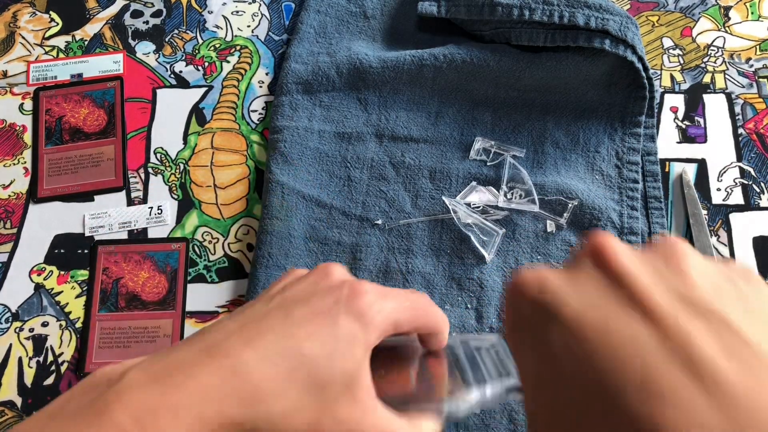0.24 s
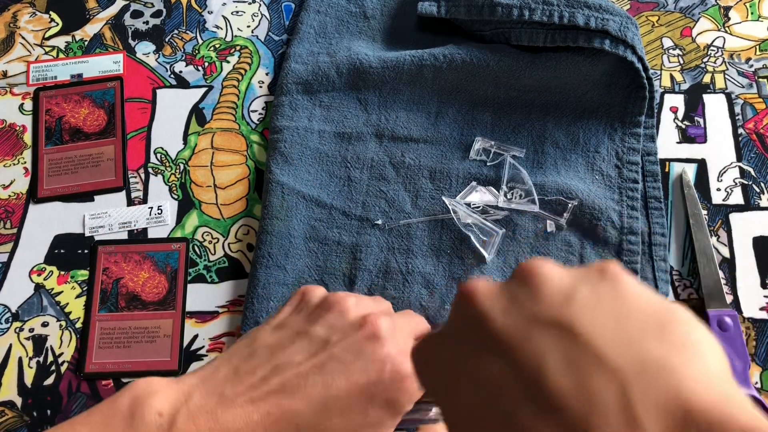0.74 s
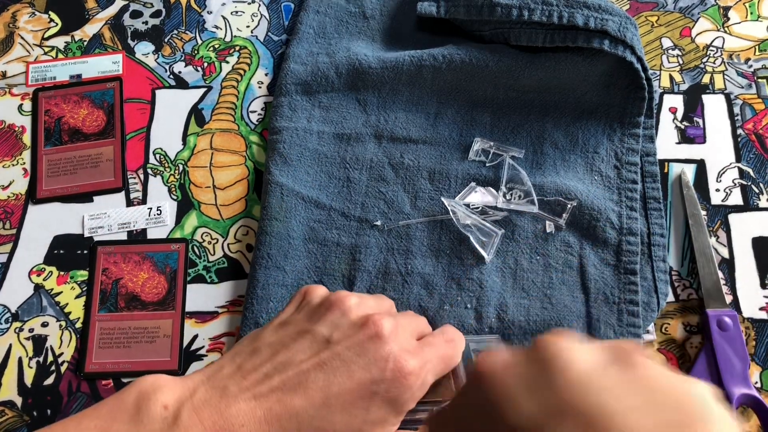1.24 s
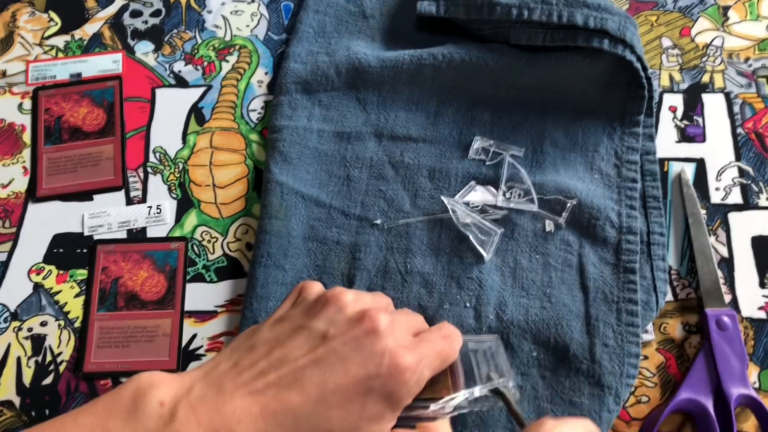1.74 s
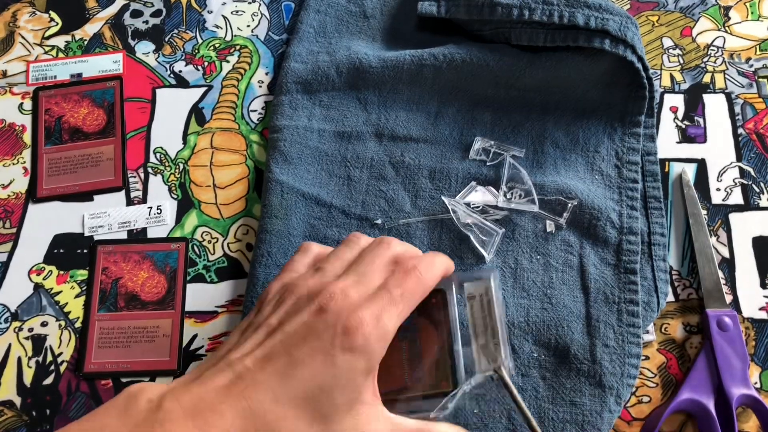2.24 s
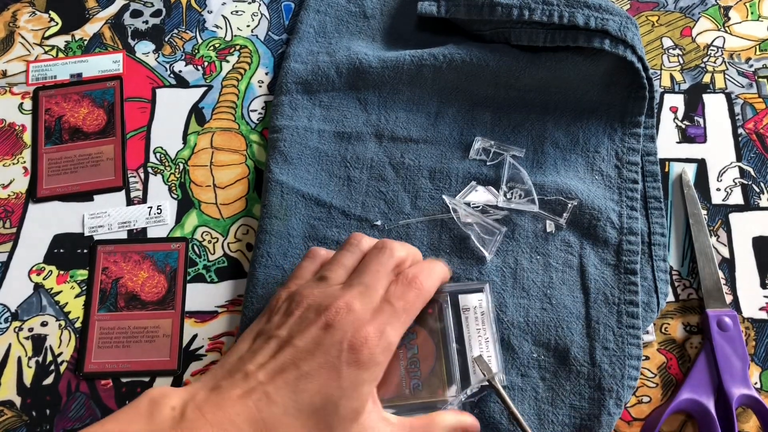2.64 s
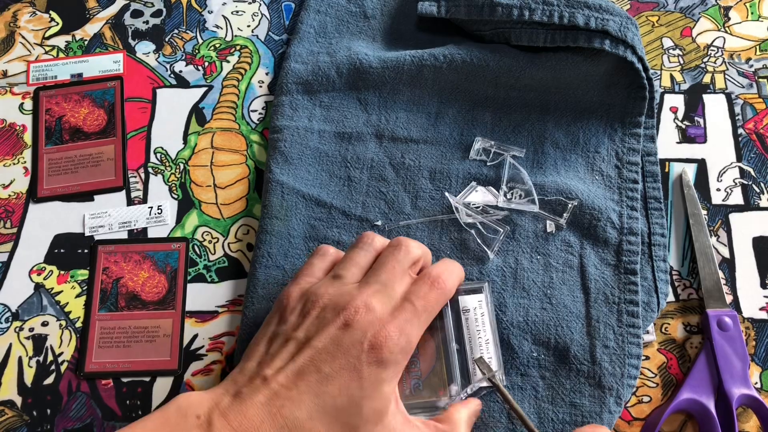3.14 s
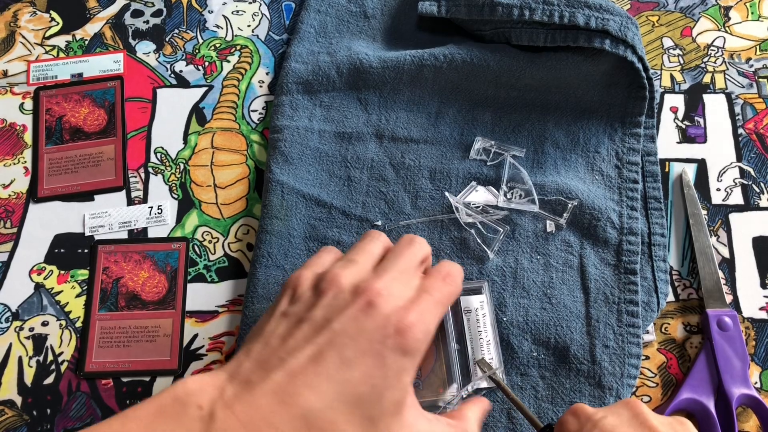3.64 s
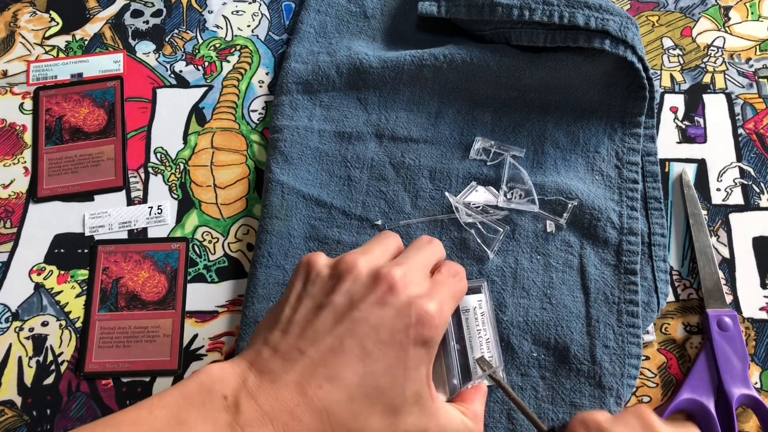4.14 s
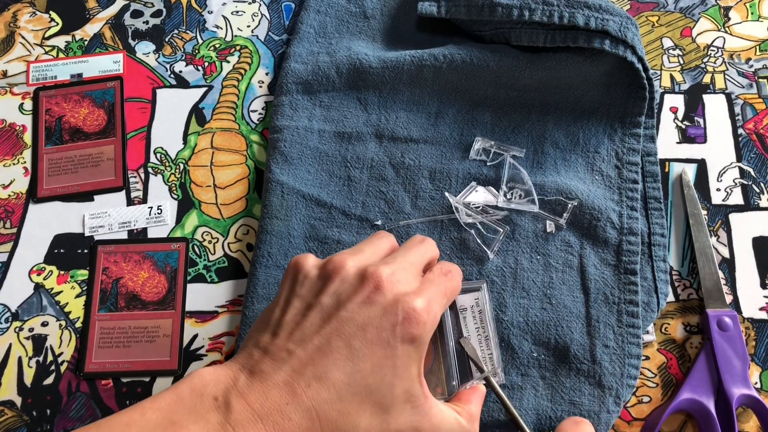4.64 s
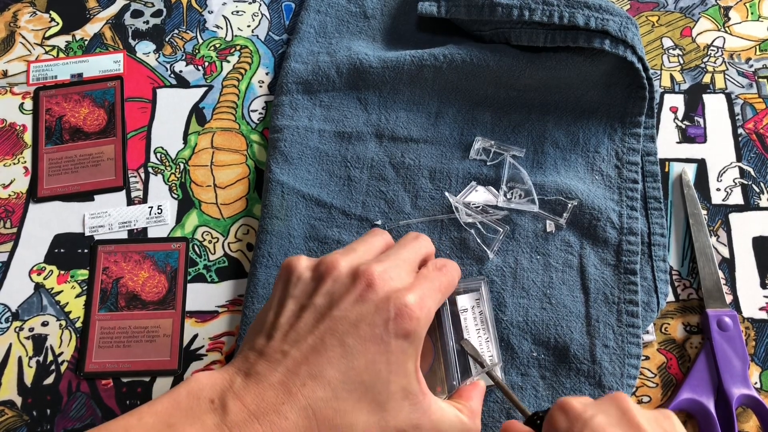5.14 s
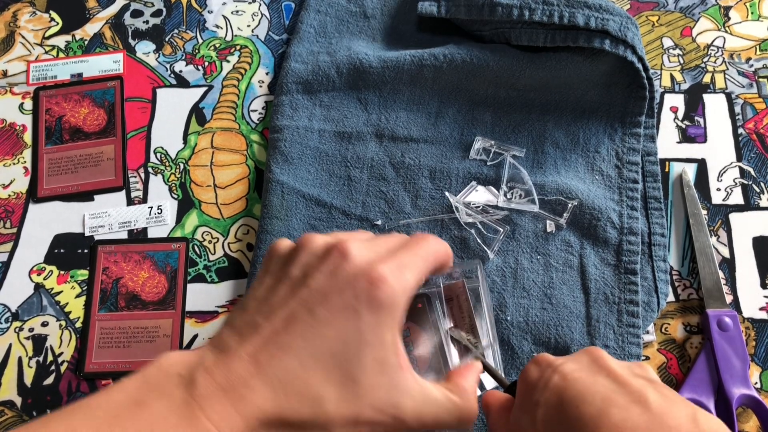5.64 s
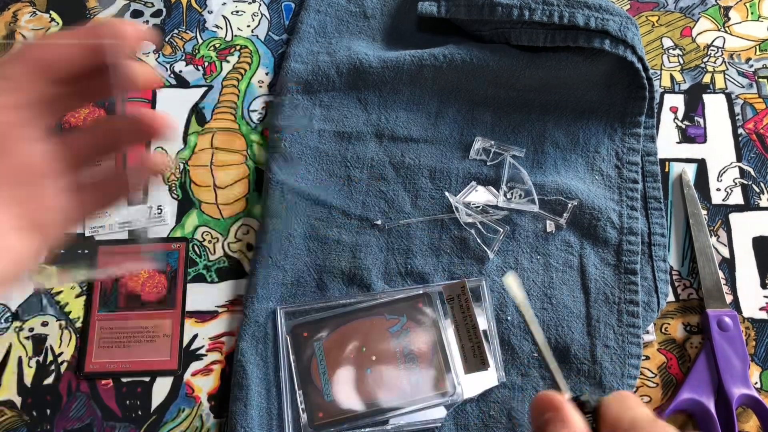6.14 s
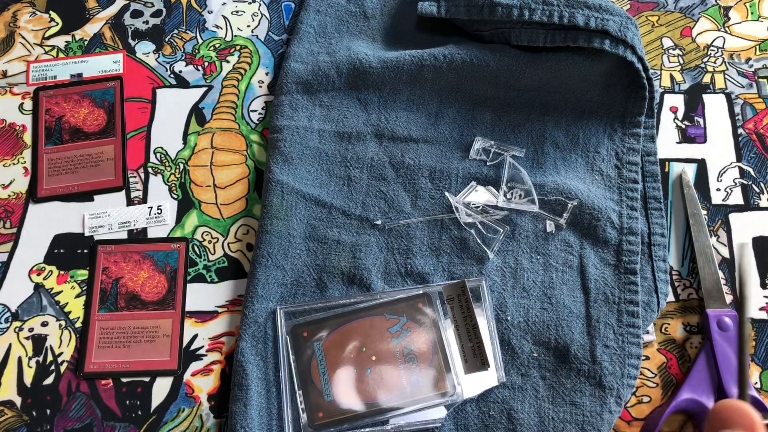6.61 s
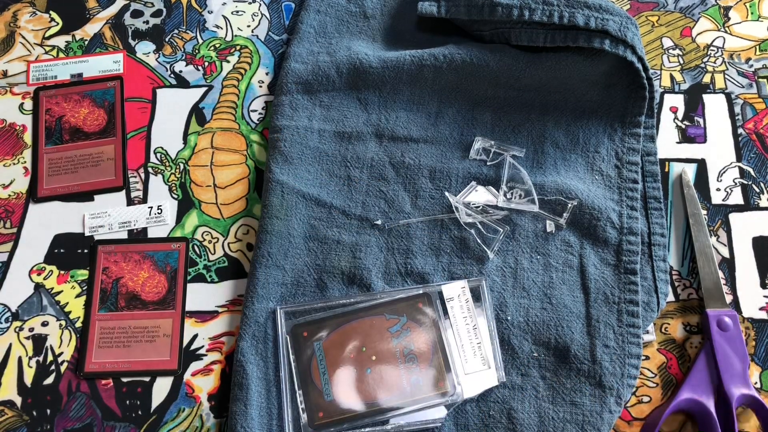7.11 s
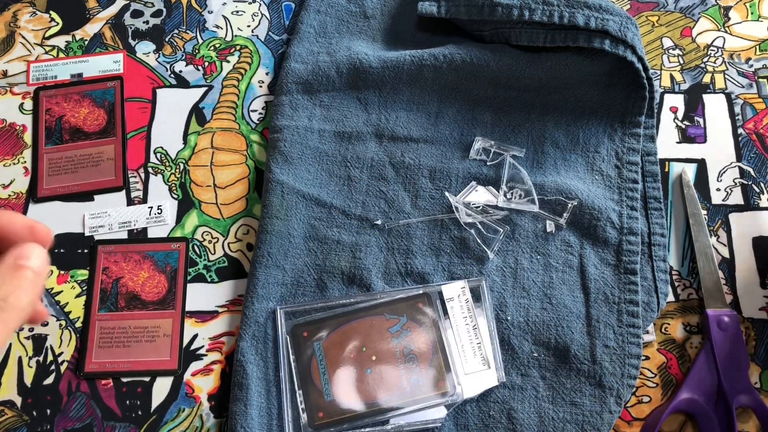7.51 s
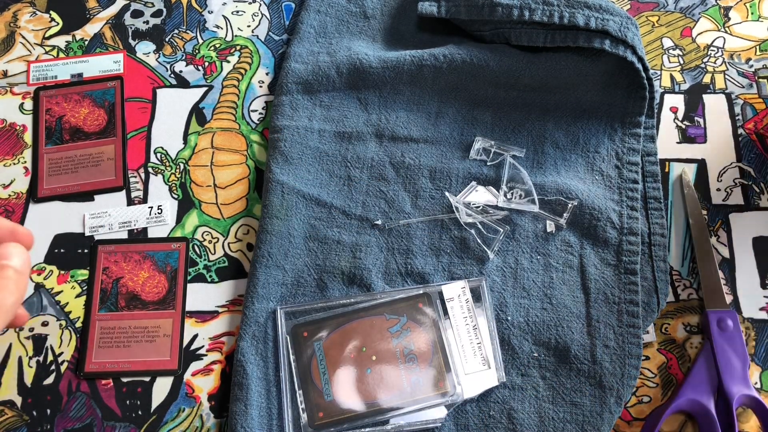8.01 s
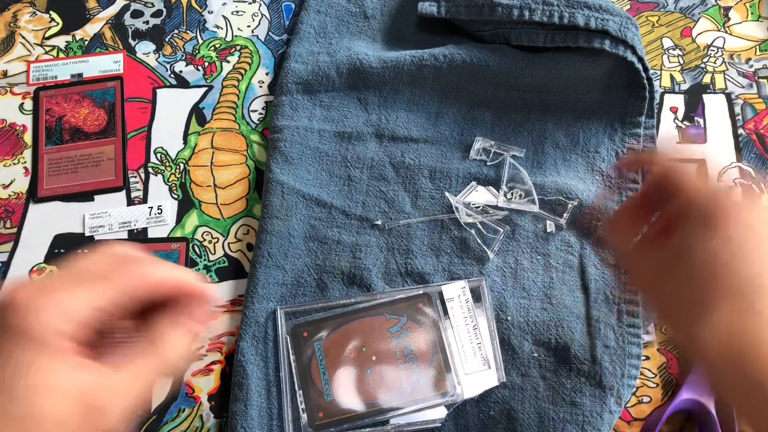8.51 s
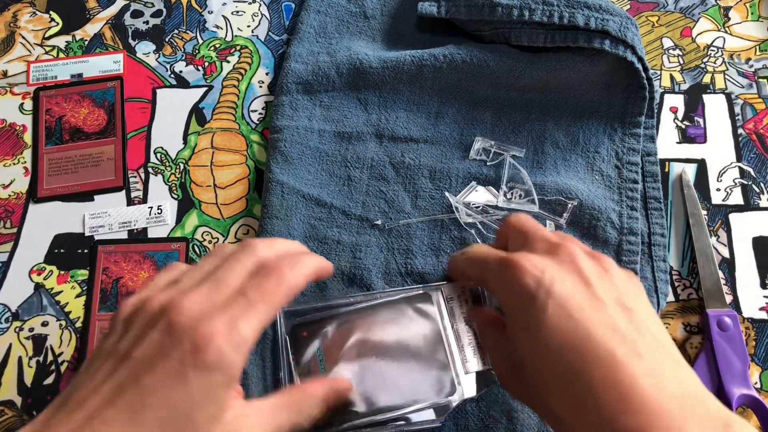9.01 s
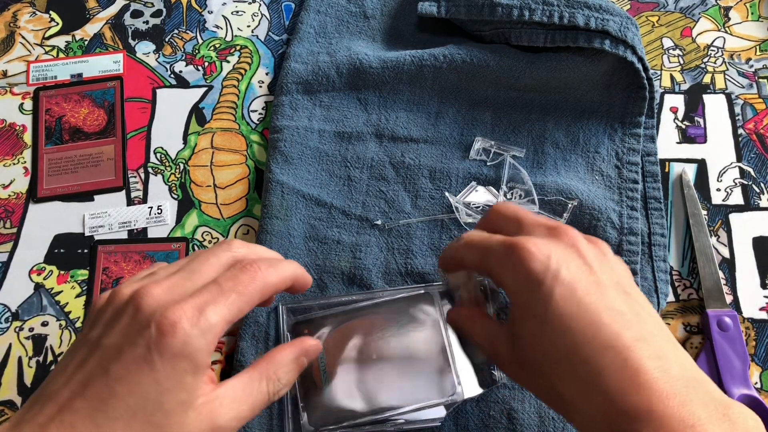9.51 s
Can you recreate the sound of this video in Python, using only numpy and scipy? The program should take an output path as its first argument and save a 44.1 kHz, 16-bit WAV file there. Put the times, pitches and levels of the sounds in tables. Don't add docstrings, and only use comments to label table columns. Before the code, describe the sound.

Near a phone microphone indoors, hands work a hard plastic shell with a blade. Faint taps lead to sharp, dry cracks with glassy ringing and low table thuds, in separate flurries. Then a short metallic rattle, a plastic lid scraping and rocking down, and faint brushing of skin and cloth. Reverberation follows the loud hits, while distant high chirps and trills continue over a low, quiet hum.

```python
import sys
import numpy as np
from scipy import signal
from scipy.fft import rfft, irfft
from scipy.io import wavfile
from scipy.ndimage import uniform_filter1d, minimum_filter1d

SR = 44100
rng = np.random.default_rng(int(sys.argv[2]) if len(sys.argv) > 2 else 0)


def to_wav(sig):
    pcm = np.clip(np.atleast_2d(sig), -1, 1) * 32767
    pcm = np.round(pcm).astype(np.int16)
    wavfile.write(sys.argv[1], SR, pcm.T)


def amplitude_ratio(level_db):
    exponent = np.asarray(level_db, float) / 20
    return 10 ** exponent


N = 430416


def evened(x):
    return x / np.sqrt(np.mean(x ** 2) + 1e-20)


def peaked(x):
    return x / np.max(abs(x))


def read(points, hz):
    f, value = np.transpose(points)
    return np.interp(np.log(hz + 1), np.log(f + 1), value)


def add(mix, s, sound):
    part = mix[round(s * SR):][:len(sound)]
    part += sound[:len(part)]


def ring(modes, t):
    return sum(amplitude_ratio(db - 60 * t / max(t60, .002)) * np.sin(2 * np.pi * hz * t) for hz, db, t60 in modes)


def coloured(points, size):
    z = rfft(rng.standard_normal(size))
    return evened(irfft(z * amplitude_ratio(read(points, np.fft.rfftfreq(size, 1 / SR))), size))


def high_pass(x, order, cut_hz):
    return signal.sosfilt(signal.butter(order, cut_hz, "high", fs=SR, output="sos"), x)


def blended(modes, size):
    hz = abs(np.fft.fftfreq(4096, 1 / SR))
    power = 0
    for f, db, t60 in modes:
        decay = np.log(1000) / min(t60, .009)
        power = power + amplitude_ratio(2 * db) / (decay ** 2 + (2 * np.pi * (hz - f)) ** 2)
    return np.fft.ifft(np.exp(np.conj(signal.hilbert(np.log(power) / 2)))).real[:size]


GRIP_STARTS = [0, 1.58, 2.5, 3.12, 3.26, 3.5, 4.9, 5.42, 7.5]
# pitch_hz, width_hz, level_db
GRIP_RINGS = [
    [(1157, 100, -11.5), (4700, 140, 1.5), (7600, 150, 0), (9500, 200, -6)],
    [(1220, 89, 4.5), (1700, 110, 10), (4590, 140, -8), (6905, 220, 16.5), (8000, 90, 15), (9400, 120, -3),
     (10500, 200, 13.5)],
    [(1680, 86, -3.5), (1220, 210, -6), (4920, 140, -3.5), (6900, 170, -12.5)],
    [(1180, 120, -5.5), (1330, 130, -1), (1850, 90, -10), (2525, 77, -1.5), (3400, 160, -3.5),
     (4720, 200, 5), (6400, 87, 6.5), (8900, 200, 6)],
    [(1320, 110, -1), (1840, 60, -5.5), (2540, 150, 3), (3340, 160, 6), (4400, 85, 6), (5130, 70, 7.5),
     (6420, 60, 14), (7600, 50, 16), (8810, 200, 13)],
    [(860, 60, 0.41), (1500, 72, 4.5), (2270, 90, 2), (3140, 240, 8), (4300, 70, 10), (4860, 160, 10),
     (5630, 180, 6.1), (6520, 147, 14), (8300, 190, 12)],
    [(1320, 110, -9), (2260, 140, 7), (6890, 160, 21), (7800, 81, 14.5)],
    [(1100, 44, -10), (1770, 95, -8), (2800, 89, -4.5), (4000, 56, 2), (4900, 100, 3.5), (6910, 100, 8)],
    [(1000, 90, -15.5), (1800, 310, -1.5), (4500, 200, 2), (5400, 200, 7), (7900, 300, -1.5),
     (9500, 300, -16), (11650, 300, -9), (13750, 300, -13)],
]


def snap(s, hz, treble_db):
    t = np.arange(1400) / SR
    burst = rng.standard_normal(len(t)) * (amplitude_ratio(-60 * t / .006) + amplitude_ratio(-17 - 60 * t / .022))

    grip = GRIP_RINGS[np.searchsorted(GRIP_STARTS, s, "right") - 1]
    held = [(f, db, min(2.2 / width, (220 / f) ** 2 + .0012, .018)) for f, width, db in grip]
    own_ring = (hz, 1 + 4.5 * np.log2(max(hz, 3500) / 3500), .011)
    modes = sorted(held + [own_ring])

    rise, push_t60 = (8, .0016) if treble_db < -15 else (1, .0004)
    push = np.minimum(t[1:61] * SR / rise, 1) * amplitude_ratio(-60 * t[:60] / push_t60)
    shove = (3 + burst[:60]) * push

    swing = ring(modes[::2], t) - ring(modes[1::2], t)
    body = peaked(np.convolve(shove, swing)[:len(t)])
    body = high_pass(body, 3, 700)

    top_hz = 14000 if s < 6.4 else 12000
    bright = signal.butter(2, [3200, top_hz], "bandpass", fs=SR, output="sos")
    treble = peaked(signal.sosfilt(bright, burst))
    flat = signal.sosfilt(bright, t == 0)
    flat = flat * np.linalg.norm(treble) / np.linalg.norm(flat)

    damped = np.convolve(push, blended(modes, len(t)))[:len(t)]
    damped = high_pass(damped, 3, 700)
    damped = damped * np.linalg.norm(body) / np.linalg.norm(damped)

    near = body + amplitude_ratio(treble_db + 4.0) * treble
    around = amplitude_ratio(-1.0) * damped + amplitude_ratio(treble_db) * (flat + 0.053 * treble)
    return np.array([near, around]) / np.max(abs(near))


# start_s, peak_db, pitch_hz of the event's own ring,
# treble_db over the peak, squash_db the limiter took off the direct sound
SEAM_BREAKS = [(1.5591, 1, 6200, 14.5, -5), (1.6017, 1.5, 1000, -1, 5), (2.9002, -1, 2260, -13.5, -8.5),
               (3.1853, -7.5, 1680, -6, 4), (3.19, -6, 3170, -7, -2.5), (3.209, -12.5, 2000, -0.5, -4.5),
               (3.2148, 6, 1330, -5.5, -0.5), (3.2159, -1, 1235, -6.5, -1.5), (3.276, 4, 2494, -5, 1.5),
               (3.6589, -1, 6300, -10, 3), (3.6609, -1.5, 640, -9.5, -4), (5.213, 0, 2355, 1.5, -1),
               (5.2339, -5.5, 2300, -9, -15), (5.3707, -2.5, 1780, 6, -9), (5.3973, -14, 1720, -3.5, -5),
               (5.4252, -1, 1480, -0.5, 2), (5.4278, -7, 1670, -10.5, -1.5), (5.4344, -2.5, 2360, 0, -14),
               (5.4371, 1, 1886, 6, -9), (5.443, 1.5, 1950, 2.5, -2), (8.1689, -13, 7000, -11.5, -13)]
# start_s, peak_db, pitch_hz, treble_db over the peak
SMALL_CRACKS = [(1.1737, -21.5, 1100, 7), (1.2598, -26, 2980, 18), (2.6995, -40.5, 3695, 1),
                (2.879, -24.5, 2297, 9.5), (2.914, -19, 1700, 0.5), (2.93, -25, 1587, 4),
                (2.9855, -19.5, 3070, 4), (3.033, -25.5, 1232, -4), (3.1506, -26.5, 1480, -4),
                (3.1546, -19.5, 3150, -1.5), (3.1771, -14.5, 1406, -5.5), (3.1997, -10, 1276, -6),
                (1.5702, -14, 4500, 3), (1.5998, -26.5, 4500, 13), (3.5621, -13, 2570, 13),
                (3.5973, -12.5, 2454, 14), (3.649, -20.5, 4700, 6), (4.9859, -25, 2158, -8.5),
                (4.9951, -27, 2450, -8), (5.0575, -16, 2270, -0.5), (5.132, -19.5, 2170, 17),
                (5.162, -15, 2270, -6.5), (5.2385, -14.5, 5066, 4.5), (5.259, -26, 5000, 0.5),
                (5.2905, -20, 1800, 1.5), (5.299, -25, 4946, 6.5), (5.3244, -16.5, 1844, 32.5),
                (5.3306, -15, 2260, -14.5), (6.5259, -20, 1100, -2.5), (7.1018, -28.5, 4030, -1),
                (9.3193, -34, 3990, 5), (9.483, -34.5, 5400, -4)]
# start_s, peak_db, treble_db over the peak
LID_ROCKS = [(8.1214, -27, -20), (8.1249, -19, -31), (8.162, -25, -4), (8.1829, -26.5, -11),
             (8.256, -26.5, 20), (8.266, -41, 2), (8.2836, -25, -15), (8.301, -36, 5), (8.279, -36, 0),
             (8.3123, -25, -10), (8.426, -42, 4), (8.377, -47, -15)]
# start_s, peak_db, pitch_hz
DULL_TAPS = [(0.3005, -38.5, 2230), (1.938, -34.5, 1210), (4.0807, -46, 1560), (4.124, -47.5, 2390),
             (4.241, -37.5, 1717), (4.4306, -29.5, 1770), (4.797, -47, 1595), (5.025, -32.5, 1260),
             (5.4941, -17.5, 1870), (5.7078, -28, 1800), (5.728, -32.5, 1370), (6.5482, -36, 1093),
             (8.4263, -32.5, 2183), (9.1045, -36.5, 1680), (9.2398, -44, 2110)]
# start_s, peak_db
FAINT_TICKS = [(1.114, -45), (1.537, -48), (1.547, -50.5), (1.81, -26), (1.932, -44.5), (4.233, -51),
               (4.543, -52), (4.83, -54), (4.918, -50.5), (4.948, -44), (8.897, -47), (2.81, -42),
               (2.9213, -35.5), (2.995, -35), (3.093, -37.5), (3.112, -30.5), (3.1423, -34), (3.148, -27.5),
               (3.168, -29.5), (3.6155, -38.5), (3.338, -24), (4.938, -43.5), (4.964, -38.5),
               (9.534, -34.5)]


def case():
    lid_hz, tick_hz = 690, 2200
    tap_treble_db, tick_treble_db = -24.5, 3.5
    feed_db, feed_loss_per_treble_db = -5.5, 0.03

    small = list(SMALL_CRACKS)
    small += [(s, db, lid_hz, treble_db) for s, db, treble_db in LID_ROCKS]
    small += [(*row, tap_treble_db) for row in DULL_TAPS]
    small += [(*row, tick_hz, tick_treble_db) for row in FAINT_TICKS]
    small = [(*row, feed_db - feed_loss_per_treble_db * max(row[3], 0)) for row in small]

    near, full = np.zeros((2, N))
    for s, db, hz, treble_db, squash_db in list(SEAM_BREAKS) + small:
        direct, around = amplitude_ratio(db) * snap(s, hz, treble_db)
        add(near, s, direct)
        add(full, s, amplitude_ratio(squash_db) * around)
    return near, full


# start_s, peak_db, rattle_t60_s
BLADE_BOUNCES = [(6.722, 1, 0.024), (6.7245, 0, 0.017), (6.73, -2.5, 0.038), (6.741, -7.5, 0.046),
                 (6.7513, -13, 0.091), (6.7722, -6, 0.042), (6.7789, -8.5, 0.036), (6.7859, 2, 0.031),
                 (6.7912, 2.5, 0.023), (6.7944, -1.5, 0.05), (6.798, 0.5, 0.046), (6.8117, -4.5, 0.048),
                 (6.831, -3, 0.052), (6.84, -10, .04), (6.846, -12, 0.093), (6.868, -17.5, 0.038)]
# pitch_hz, level_db, t60_s
STEEL_RINGS = [(1644, -13.5, 0.034), (1800, 4, 0.93), (2110, -3.5, .02), (2970, -7, 0.82),
               (3560, -12, 0.24), (5100, -24, 0.92), (5220, -8.5, 0.28), (6300, -5, 0.091),
               (7260, -14.5, 0.23), (7990, -24, 1.6), (7400, -3.5, 0.38), (8730, -15.5, 0.044),
               (10510, -31, 0.46), (13260, -12.5, 0.48)]
# pitch_hz, level_db per Hz
BLADE_HISS = [(180, -51.5), (300, -20), (1320, -6), (1840, -3.5), (2930, 0), (4230, -1), (7800, 1.5),
              (16000, -19)]


def blade():
    cloth_t60_s = .011
    rattle, t = np.zeros(N), np.arange(4000) / SR
    for s, db, t60 in BLADE_BOUNCES:
        add(rattle, s, amplitude_ratio(db - 60 * t / max(t60, .005)))
    steel = ring([(hz, db, min(t60, cloth_t60_s)) for hz, db, t60 in STEEL_RINGS], t)
    steel = steel / np.linalg.norm(steel)
    rung = signal.oaconvolve(rattle * rng.standard_normal(N), steel)[:N]
    return amplitude_ratio(-13.5) * rattle * coloured(BLADE_HISS, N) + amplitude_ratio(-18.0) * rung


# pitch_hz, level_db, t60_s
TABLE_RINGS = [(128.5, -5, 0.15), (209.4, -3.5, 0.19), (249.6, 4.5, 0.084), (353, -5.5, 0.063)]
# pitch_hz, level_db, t60_s
LID_RINGS = [(487, -35, 0.054), (863, -27, 0.051), (1040, -58, .02), (1860, -57.5, .01), (2470, -61, .04)]


def drag(length, rumble_db, hiss_db, fade_db, knock):
    t = np.arange(12000) / SR
    now = np.arange(0, length, 1 / SR)
    rub = signal.lfilter(*signal.butter(2, 2600, fs=SR), rng.standard_normal(len(now)))
    rings = ring(TABLE_RINGS[2:], t) + amplitude_ratio(-52.5) * knock + ring(LID_RINGS, t)
    rumble = evened(signal.oaconvolve(rub, np.diff(rings, prepend=0))[:len(now)])

    hiss = coloured([(1900, 6.5), (3700, -4), (4500, 3), (5600, -1), (6800, 0.5), (9000, -13.5),
                     (16000, -25)], len(now))
    stick_slip = evened(uniform_filter1d(rng.standard_normal(len(now)), 900))
    hiss = hiss * amplitude_ratio(5.5 * stick_slip)

    press = np.minimum(now / 0.01, 1) * amplitude_ratio(fade_db * (now / length) ** 4.3)
    return press * (amplitude_ratio(rumble_db - 9.5) * rumble + amplitude_ratio(hiss_db + 1.5) * hiss)


# start_s, peak_db, knock_db (the part above 400 Hz) over the peak
TABLE_THUDS = [(0.296, -49, 2), (1.215, -24.5, -14), (1.525, -20, -12), (1.611, -12.5, -8),
               (2.423, -37.5, -23), (2.902, -32, 1.5), (3.223, -36, 17), (3.284, -20.5, 3), (3.669, -29, 2),
               (4.99, -49.5, 17), (5.221, -24, -1), (5.401, -27.5, 1), (5.455, -9.5, -8.5), (6.73, -16, -4),
               (6.791, -8.5, -14.5), (6.84, -16.5, -2.5), (7.752, -28, -23.5), (7.853, -27.5, -6),
               (7.91, -26, -14), (8.1234, -13.5, 3.5), (8.1624, -16, 1), (8.1844, -25.5, 2),
               (8.212, -22, -8), (8.23, -35, -3), (8.257, -49, 2), (8.288, -32, 9), (8.385, -26, -8.5)]
# pitch_hz, level_db, t60_s
KNOCK_RINGS = [(450, 0, .025), (620, 0, .03), (790, -2, .03), (1000, -3, .025)]
# start_s, length_s, rumble_db, hiss_db, fade_db over the length
LID_DRAGS = [
    (7.845, 0.47, -31.5, -65.5, -5),
    (8.131, 0.37, -34.5, -55, -43),
]


def table():
    out, t = np.zeros(N), np.arange(12000) / SR
    low, knock = peaked(ring(TABLE_RINGS, t)), peaked(ring(KNOCK_RINGS, t))
    soft_rise = 1 - np.exp(-t / 0.0069)
    for s, db, knock_db in TABLE_THUDS:
        add(out, s, amplitude_ratio(db) * (low * soft_rise + amplitude_ratio(knock_db + 2.5) * knock))
    for s, *settings in LID_DRAGS:
        add(out, s, drag(*settings, knock))
    return high_pass(out, 3, 105)


# start_s, length_s, level_db
SKIN_BRUSHES = [
    (1.511, 0.015, -54),
    (5.094, 0.0045, -60),
    (5.177, 0.0094, -40),
    (5.194, .004, -60),
    (7.722, 0.062, -64),
    (8.857, 0.17, -67.5),
    (9.202, 0.067, -63.5),
    (9.364, 0.059, -63),
    (9.42, 0.13, -58),
    (9.524, 0.11, -61),
]


def brushes():
    shape = np.zeros(N)
    for s, length, db in SKIN_BRUSHES:
        add(shape, s, amplitude_ratio(db) * np.hanning(round(length * SR)))
    return shape * coloured([(2000, -21.5), (5000, -5.0), (9000, -15.0), (16000, -15.0)], N)


# pitch_hz, t60_s
ROOM_DECAY = [(100, 0.25), (260, 0.63), (700, 0.64), (1800, 0.96), (5000, 0.73), (9000, 0.55), (14000, .4)]
# start_s after the gap, width_s, level_db over the tail
WALL_ECHOES = [(.004, 0.0033, -1), (0.024, 0.0037, -0.5), (0.045, .004, -8)]


def room(x, gap):
    taps = np.zeros(SR)
    at = np.arange(0, SR - 12, 12)
    at = at + rng.integers(0, 12, len(at))
    taps[at] = rng.choice([-1., 1.], len(at))
    hz, t, z = signal.stft(taps, SR, nperseg=256)
    tail = signal.istft(z * amplitude_ratio(-60 * t / read(ROOM_DECAY, hz)[:, None]), SR, nperseg=256)[1]
    late = np.arange(len(tail)) / SR
    tail = tail / np.linalg.norm(tail) * np.minimum(0.56 + late / 0.036, 1)
    tail = tail * (1 + sum(amplitude_ratio(db) * np.exp(-((late - s) / wide) ** 2) for s, wide, db in WALL_ECHOES))
    tail[0] = amplitude_ratio(-18.0)
    return signal.fftconvolve(x, np.r_[np.zeros(round(gap * SR)), tail])[:N]


def chirp(length, start_hz, end_hz, db, sweeps):
    t = np.arange(0, length, 1 / SR)
    trilled = sweeps > 20
    u = (t * sweeps) % 1 if trilled else t / length
    span = abs(np.log(end_hz / start_hz))
    waver = np.interp(t, np.arange(80) * .005, rng.standard_normal(80))
    hz = end_hz + (start_hz - end_hz) * abs(1 - u) ** 1.1
    hz = hz * (1 + (.004 + .035 * span) * waver)
    if trilled:
        pulse = np.sin(np.pi * u ** (.6 if end_hz < start_hz else 1)) ** 0.8
        swell = pulse * amplitude_ratio(1.1 * waver) * np.sin(np.pi * t / length) ** .4
    else:
        swell = 1 - .6 * u * min(4 * span, 1)
    swell = swell * signal.windows.tukey(len(t), alpha=.3)
    return amplitude_ratio(db + 5.5 + 1.6 * waver) * swell * np.sin(2 * np.pi * np.cumsum(hz) / SR)


# start_s, length_s, start_hz, end_hz, level_db
BIRD_GLIDES = [(0.852, 0.032, 5270, 5980, -61.5), (0.853, 0.0099, 6150, 7000, -71),
               (0.858, 0.016, 4000, 4400, -69), (0.902, 0.0079, 3800, 5200, -54.5),
               (2.558, 0.018, 4300, 3400, -66), (2.579, 0.031, 3400, 3000, -68.5),
               (2.697, 0.0073, 5930, 5800, -51), (2.73, 0.02, 4316, 3320, -65),
               (4.131, 0.027, 5400, 3780, -52), (4.162, 0.043, 3900, 2250, -52.5),
               (6.03, 0.029, 4690, 4800, -73), (6.07, 0.017, 4900, 4260, -69),
               (6.247, 0.032, 2800, 2840, -73), (6.319, 0.05, 2980, 3000, -76),
               (6.404, 0.18, 2400, 2350, -79), (9.048, 0.039, 5400, 5380, -69.5),
               (9.389, 0.034, 6100, 6220, -62), (9.447, 0.045, 4900, 3380, -58.5),
               (9.53, 0.018, 2525, 2900, -52), (9.735, 0.023, 6600, 4270, -61),
               (6.529, 0.035, 4690, 4210, -56.5), (6.654, 0.018, 3330, 1840, -53),
               (7.365, 0.028, 6680, 5650, -60.5), (7.45, 0.068, 3610, 3990, -68.5),
               (7.778, 0.038, 3400, 3880, -71), (8.641, 0.058, 2800, 3090, -61.5),
               (8.708, .03, 3150, 3330, -68.5), (8.748, 0.066, 3400, 4240, -56),
               (8.787, 0.055, 4200, 4064, -55), (4.533, .08, 3800, 4310, -69),
               (8.82, 0.048, 4000, 3270, -66), (9.084, 0.026, 6150, 4250, -60.5),
               (9.103, 0.054, 3876, 2350, -51), (9.306, 0.045, 5270, 4060, -53),
               (9.41, 0.02, 4600, 6800, -60.5), (9.36, 0.05, 5500, 5300, -68),
               (9.48, 0.044, 1940, 2300, -56), (9.587, 0.099, 5500, 3450, -58),
               (9.632, 0.0073, 6400, 4800, -52.5), (9.704, 0.022, 4520, 4100, -47)]
# start_s, length_s, level_db
BIRD_WHISTLES = [(2.145, 0.055, -70.5), (2.245, 0.075, -68), (2.365, 0.04, -67.5), (2.425, 0.045, -68),
                 (2.5, .045, -65.5), (2.575, .02, -69), (2.7, 0.09, -71), (2.798, 0.102, -59),
                 (2.945, .03, -61), (3.045, .09, -58), (9.54, 0.015, -55.5)]
# start_s, length_s, level_db
BIRD_TRILLS = [
    (0.737, 0.14, -55.5),
    (0.915, 0.14, -57),
    (5.988, 0.13, -64.5),
    (6.145, 0.13, -68),
    (8.883, 0.32, -65.5),
    (9.158, 0.16, -63.5),
]
# (start_s in the phrase, length_s, start_hz, end_hz, level_db, sweeps a second)
BIRD_PHRASES = [
    (.015, .166, 5, [(0, .048, 3900, 6800, -60, 105)]),
    (.098, .166, 4, [(0, .016, 2200, 2700, -59, 0), (.012, .025, 2750, 1600, -63, 0), (.045, .03, 2550, 2700, -69, 0)]),
    (4.387, .189, 4, [(0, .01, 4300, 7000, -60, 0), (.01, .045, 7000, 4300, -58, 0)]),
    (4.288, .189, 4, [(0, .02, 2600, 2000, -62, 0), (.03, .02, 2500, 1600, -61, 0)]),
    (6.2, .1, 3, [(0, .1, 4550, 4000, -72, 60)]),
    (9.293, .1, 1, [(0, .05, 5700, 4300, -57, 90)]),
]


def bird():
    rows = [(*row, 0) for row in BIRD_GLIDES]
    for s, length, db in BIRD_WHISTLES:
        hz = 2900 + 70 * (min(s, 3.2) - 2)
        rows.append((s, length, hz, hz + 25, db, 0))
    rows += [(s, length, 2736, 1700, db, 70) for s, length, db in BIRD_TRILLS]
    for s, period, repeats, notes in BIRD_PHRASES:
        for k in range(repeats):
            rows += [(s + k * period + note[0], *note[1:]) for note in notes]
    out = np.zeros(N)
    for s, *settings in rows:
        add(out, s, chirp(*settings))
    return out


def smear(x):
    t = np.arange(4000) / SR
    echoes = rng.standard_normal(len(t)) * amplitude_ratio(-60 * t / .08)
    echoes[0] = amplitude_ratio(18.0)
    return signal.oaconvolve(x, echoes / np.linalg.norm(echoes))[:N]


def haze(x):
    drift_hz = np.interp(np.arange(N) / SR, np.arange(1000) * .01, 60 * rng.standard_normal(1000))
    turn = np.cumsum(drift_hz) * 2 * np.pi / SR
    return room(x * np.cos(turn), .0096) + room(x * np.sin(turn), .0096)


# pitch_hz, level_db
HUM_COLOUR = [(12, -40), (20, -7), (71, 0.5), (206, -3.5), (492, -10), (616, -10.5), (913, -16),
              (2440, -22.5), (4280, -27), (7510, -36), (15200, -42), (16500, -53.5)]


def hum():
    hum_db = -59
    lumps = evened(uniform_filter1d(uniform_filter1d(rng.standard_normal(N), 3000), 3000))
    return amplitude_ratio(hum_db + 1.0 + 1.4 * lumps) * coloured(HUM_COLOUR, N)


def scene():
    near, full = case()
    steel, wood, song = blade(), table(), smear(bird())
    wet = amplitude_ratio(-8.5) * room(full + amplitude_ratio(-5.0) * steel + amplitude_ratio(2.5) * wood, .0118)
    far = amplitude_ratio(0.5) * song + amplitude_ratio(-5.5) * haze(song)
    return (near + steel + wood + brushes() + wet + far + hum())[None]


def band_limit(x):
    return signal.sosfilt(signal.butter(12, 16920, fs=SR, output="sos"), x)


def record(dry):
    duck_from_db, duck_share = -3, 1
    lag, hold = 210, 170
    over_db = np.maximum(20 * np.log10(abs(dry[0]) + 1e-9) - duck_from_db, 0)
    kept_db = -minimum_filter1d(-over_db, size=2 * hold + 1, origin=hold)
    kept_db = signal.lfilter([1 / lag], [1, 1 / lag - 1], kept_db)
    held = np.tanh(dry * amplitude_ratio(-duck_share * kept_db) / .95) * .95
    held = high_pass(held, 1, 45)
    edge = signal.firwin(255, 16400, window=("kaiser", 8), fs=SR)
    mix = signal.oaconvolve(held, edge[None], "same")
    return band_limit(mix)


dry = scene()
out = record(dry)
to_wav(out)
```